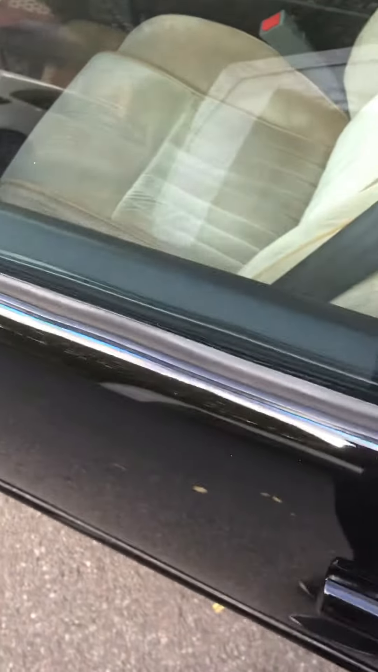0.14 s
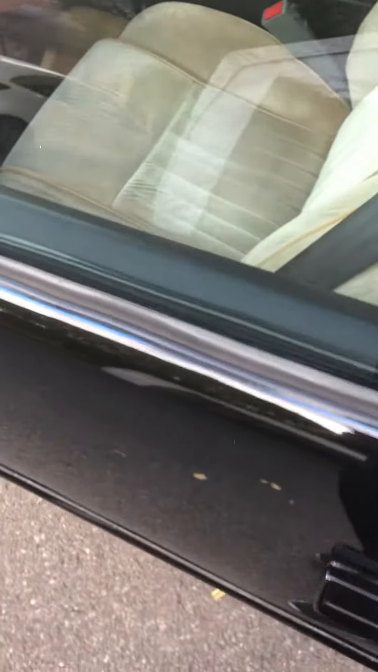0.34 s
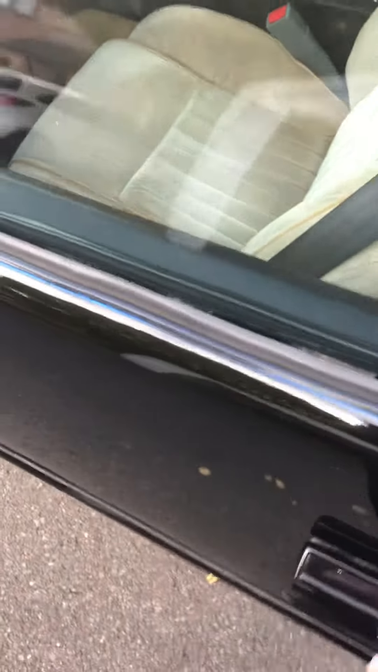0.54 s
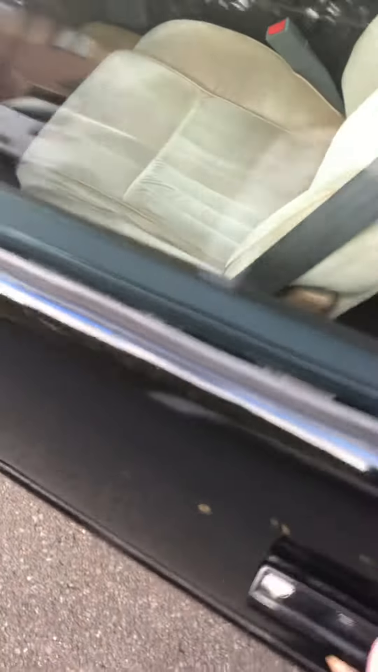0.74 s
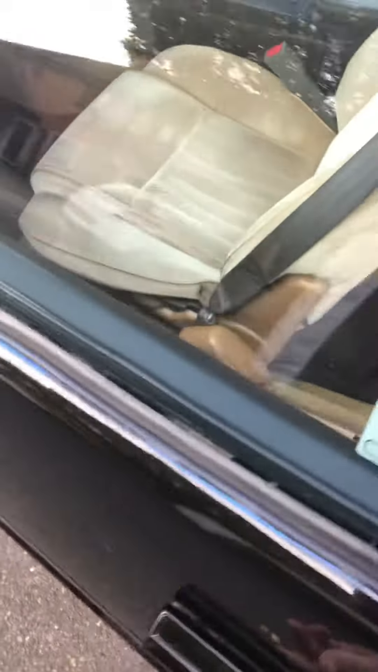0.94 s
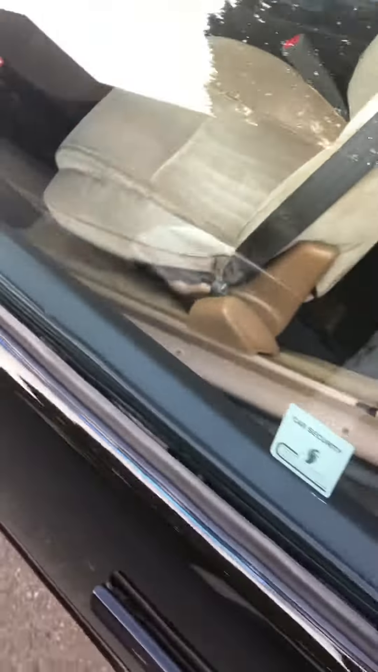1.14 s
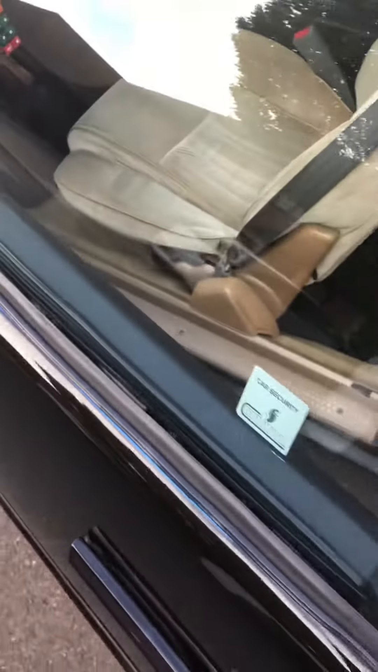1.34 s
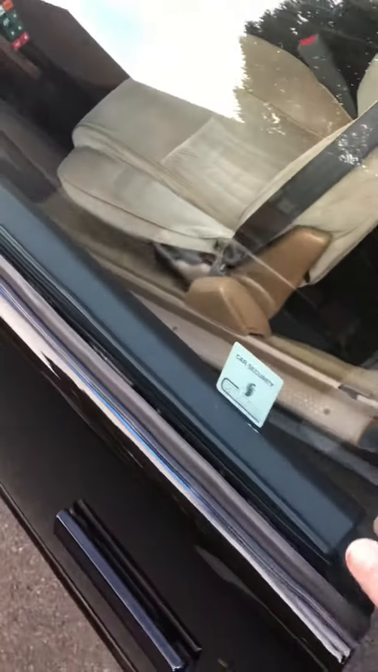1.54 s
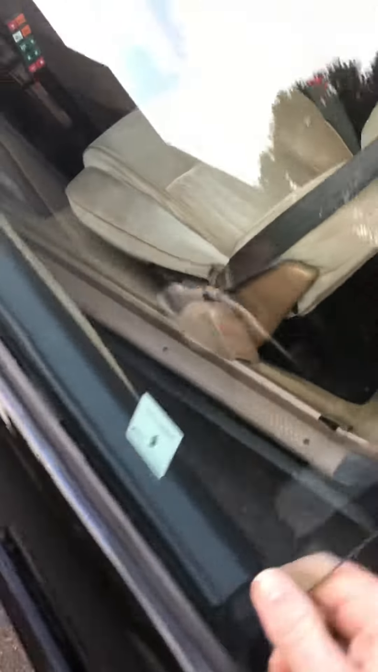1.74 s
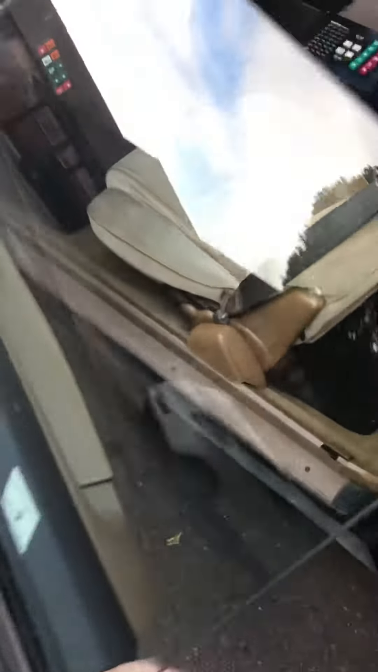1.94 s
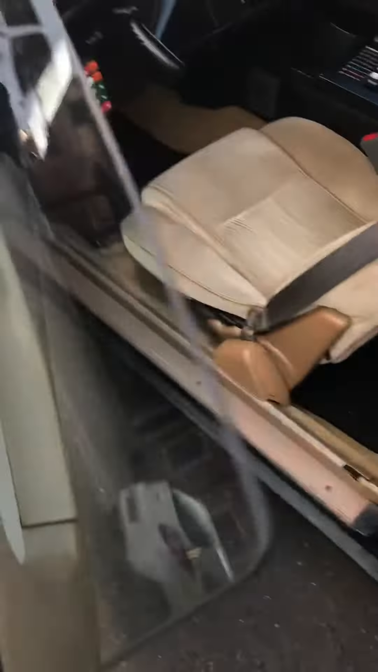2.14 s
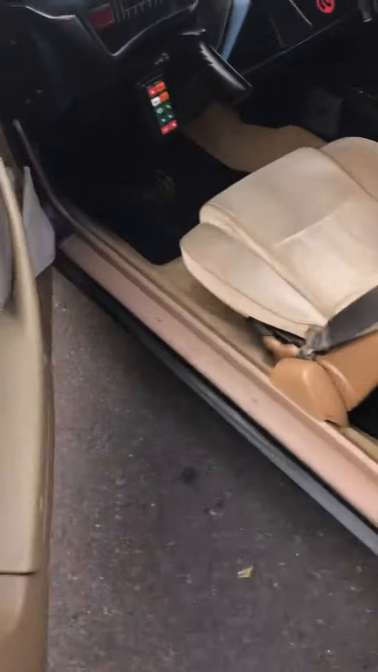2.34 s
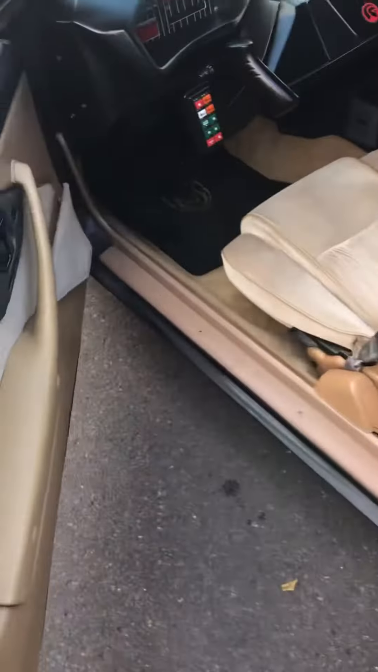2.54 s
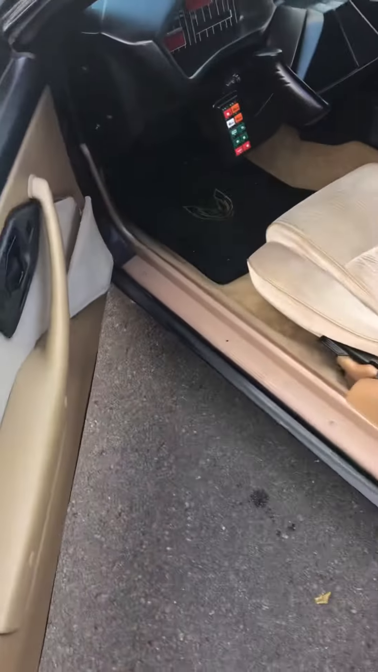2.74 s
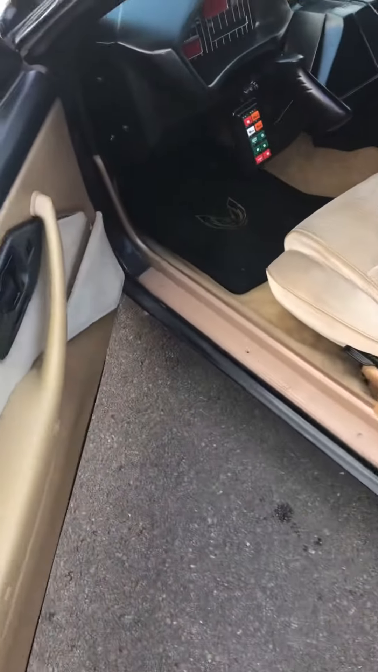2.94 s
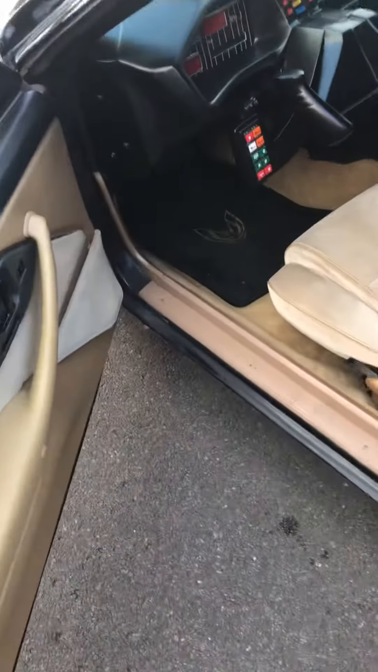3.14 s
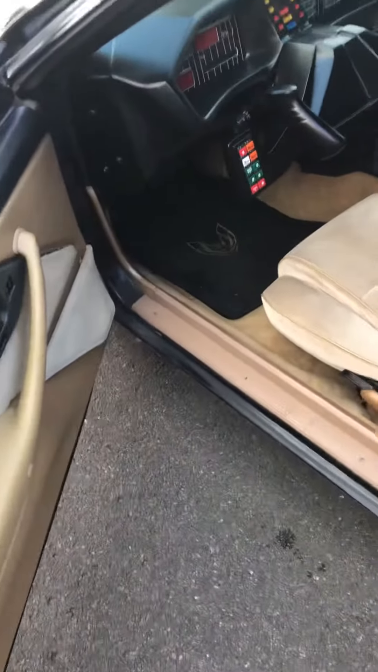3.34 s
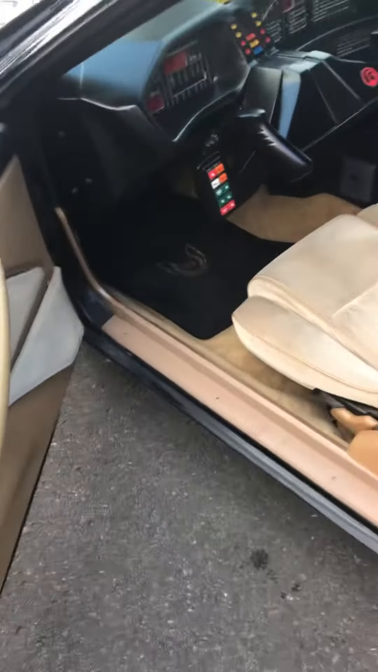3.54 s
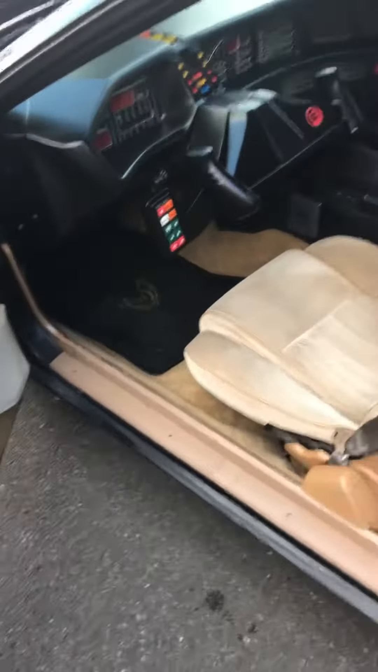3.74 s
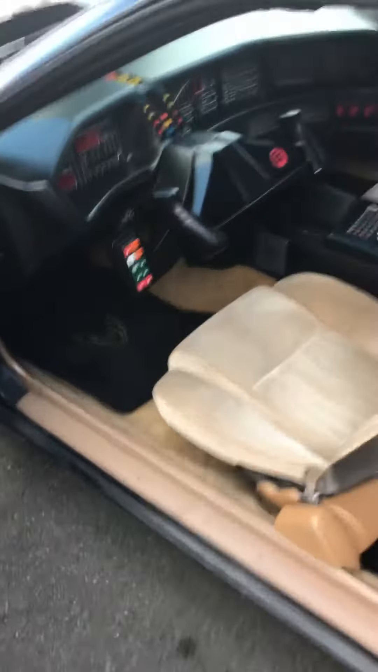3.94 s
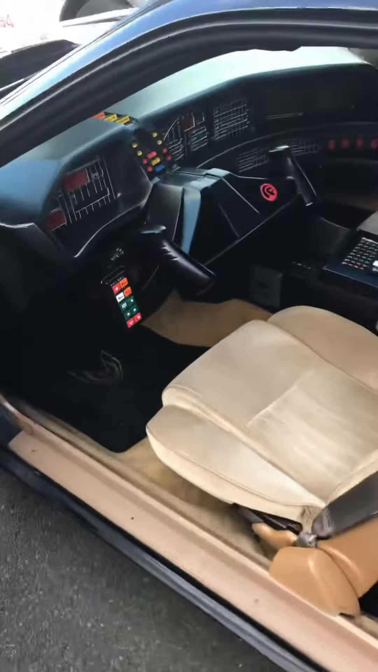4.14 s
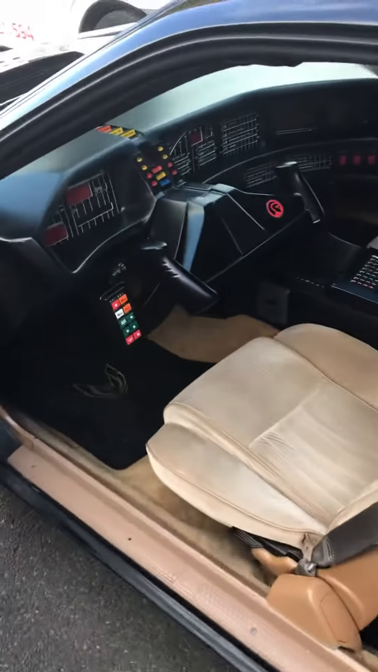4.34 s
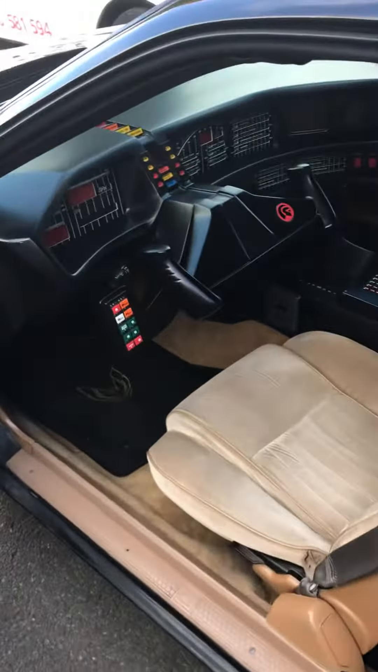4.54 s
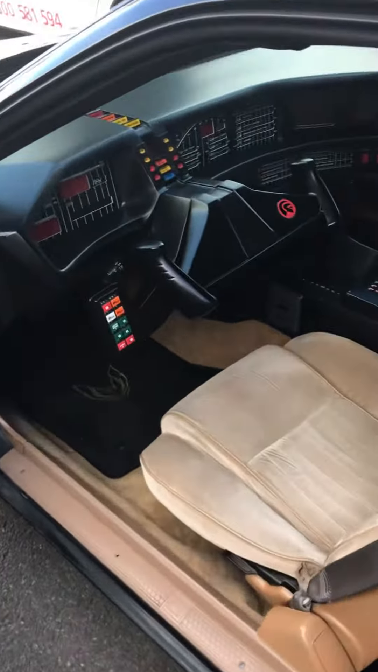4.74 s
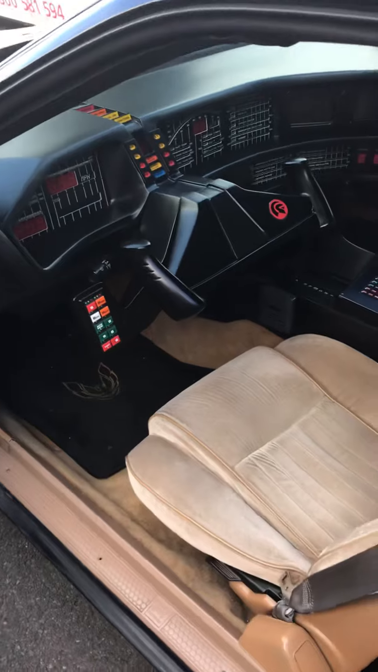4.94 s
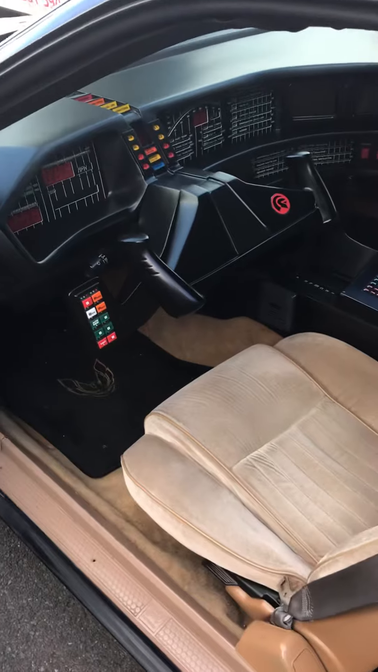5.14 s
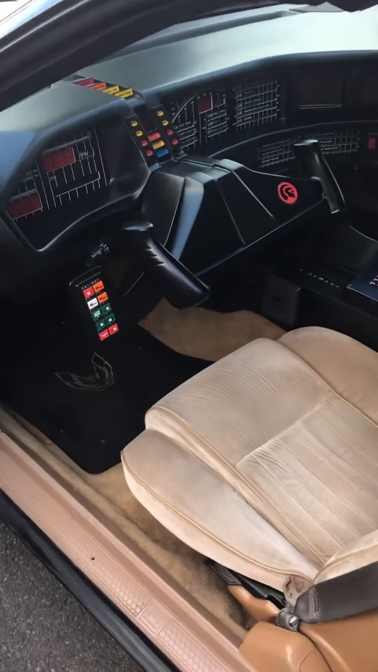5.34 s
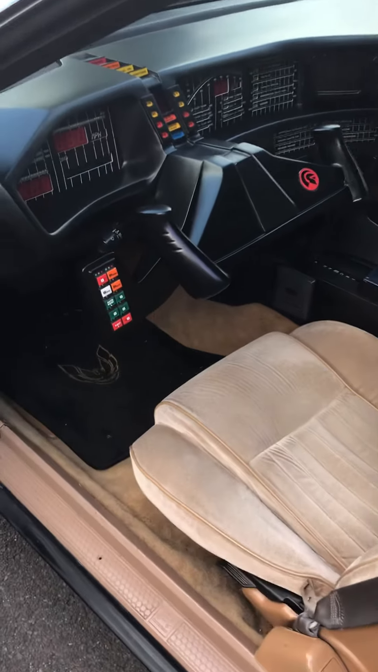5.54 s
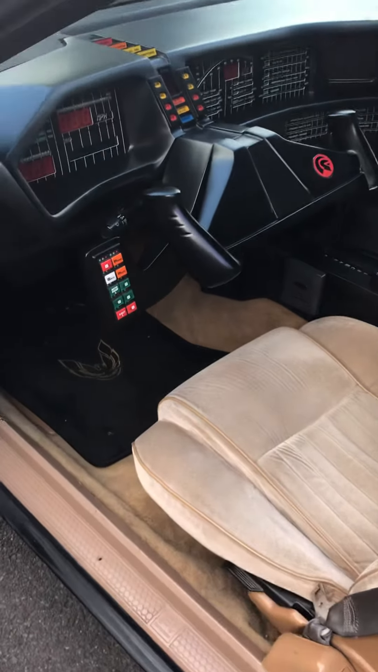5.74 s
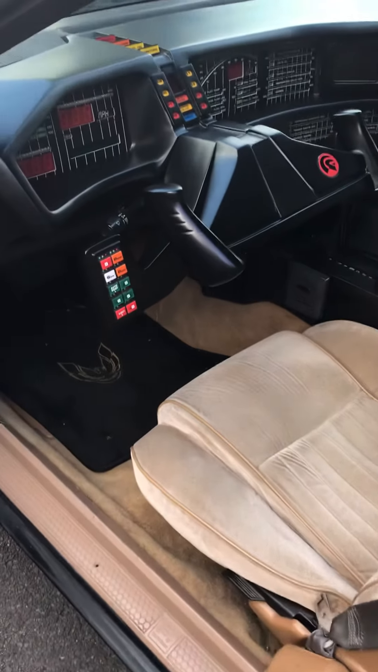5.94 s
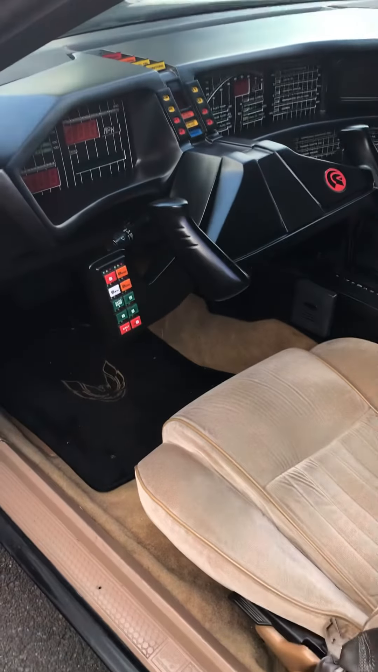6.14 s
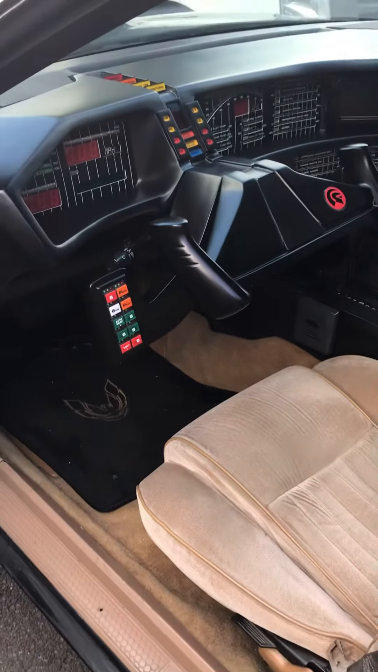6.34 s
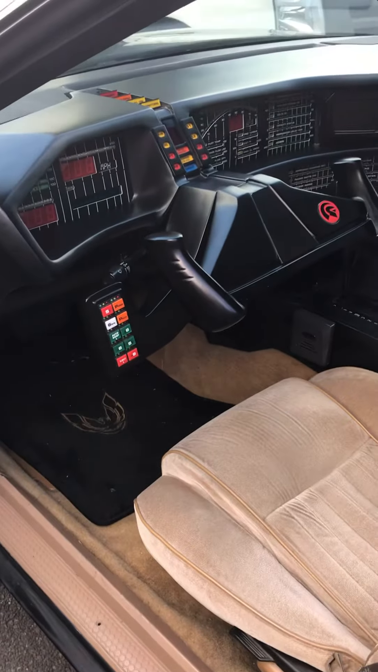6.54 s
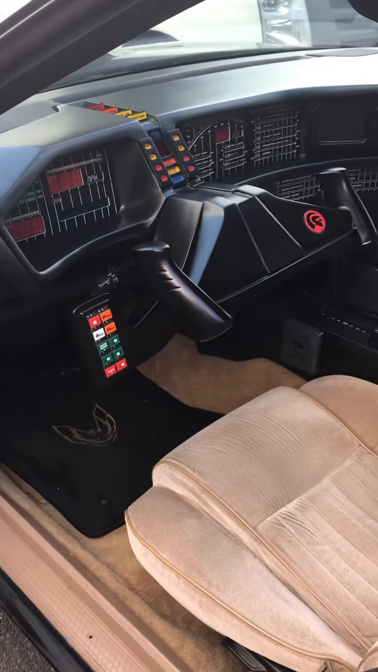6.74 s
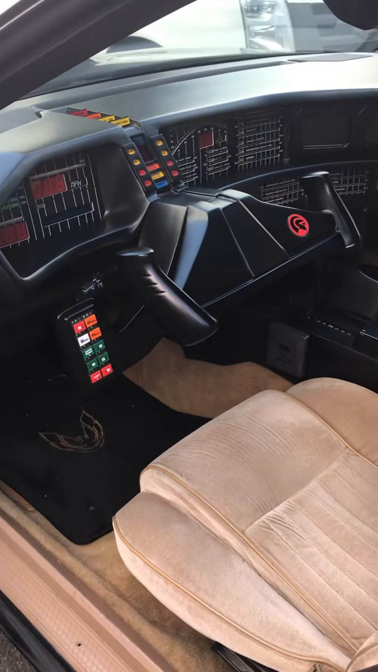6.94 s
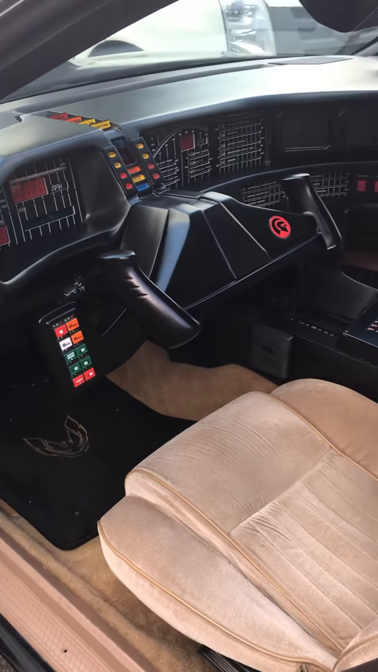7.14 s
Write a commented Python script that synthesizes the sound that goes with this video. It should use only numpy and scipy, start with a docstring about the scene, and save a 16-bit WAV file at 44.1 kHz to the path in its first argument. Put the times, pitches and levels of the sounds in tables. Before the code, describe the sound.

A car door is unlatched with sharp clicks and a hollow clack, thuds as it swings open, then quiet low engine hum and soft outdoor noise.

```python
"""Outdoor noise and a low engine hum come first; then, close by, a car door is opened from outside. The handle
clicks, the latch lets go, steel rings, and the door shudders free and swings out with a snap and bumps.
Contacts are mode clouds coloured by shell resonances and a few treble dips; steel, fittings and panel are
decaying sine modes. Bumps are sinking tones, scrapes are stick-slip click runs, and the engine is an unsteady
hum. The outdoor noise is filtered noise that changes colour as the microphone leans into the cabin."""
import sys
import numpy as np
from scipy import signal
from scipy.fft import rfft, irfft
from scipy.io import wavfile
from scipy.ndimage import uniform_filter1d

SR = 44100
rng = np.random.default_rng(int(sys.argv[2]) if len(sys.argv) > 2 else 0)


def int16_out(signal):
    """Quantize to a 16-bit WAV file."""
    q = np.round(np.clip(np.atleast_2d(signal).T, -1, 1) * 32767)
    wavfile.write(sys.argv[1], SR, q.astype(np.int16))


N = 321742

# handle, latch and hinge contacts, before trim and colouring: (time [s], level [dB], strongest [Hz], fall above
# it [dB/octave], t60 at 2500 Hz [s])
CONTACTS = [(0.2031, -32.5, 900, 8, 0.052), (0.2293, -25, 1124, 12, 0.0303),
            (0.2896, -33.5, 1300, 6.5, 0.052), (0.4633, -16.5, 600, 5, 0.0263),
            (0.4905, -22.5, 1010, 8, 0.034), (0.497, -23, 1120, 7.5, 0.0374), (0.51, -23, 600, 6.5, 0.016),
            (0.553, -37, 820, 8, 0.07), (0.564, -32.5, 910, 12, 0.086), (0.609, -39, 1390, 13, 0.147),
            (0.648, -37.5, 3100, 21, 0.052), (1.09, -32, 1500, 9, 0.25), (1.118, -21, 2700, 5, 0.088),
            (1.128, -22, 740, 9, 0.0666), (1.148, -27.5, 1300, 5.5, 0.09), (1.164, -28, 2000, 9, 0.033),
            (1.43, -50.5, 2000, -0.5, .043), (1.574, -41, 2400, 6, 0.066),
            (2.1408, -25.5, 3060, 18.5, .062), (2.177, -37, 1250, 12, 0.035),
            (3.098, -32.5, 1795, 9, 0.053), (5.322, -46, 4770, 12, 0.039)]
# edges of the bands that decay separately [Hz]
CONTACT_BAND_EDGES_HZ = [280, 800, 2000, 4000, 9000, 16000]
# resonances of handle and door shell, and dips in the treble: (centre [Hz], width [Hz], gain [dB])
CONTACT_PEAKS_AND_DIPS = [(378, 82, 6.5), (500, 72, -0.5), (713, 410, 0.5), (824, 18, 2), (986, 28.5, 2),
                          (1237, 95, 2), (1493.3, 37.5, 4.5), (1636, 547, -9.5), (1771, 48, 11),
                          (2360, 120, -3.5), (2710, 45, -3), (2957, 24.5, 4.5), (3345, 355, -2.5), (3780, 88, -1),
                          (5050, 410, -3), (6750, 510, -0.5), (7740, 880, -8.5), (10590, 660, -6)]
# blows on the door panel, before trim: (time [s], level [dB], spectrum corner [Hz], ring time [factor])
PANEL_BLOWS = [(.230, -35, 800, 2.11), (0.4629, -25, 300, 0.52), (.490, -28, 800, 1.29),
               (0.565, -39, 600, 1.72), (1.098, -33, 250, 0.74), (1.127, -16, 215.7, 1.24),
               (1.149, -26.5, 230, 0.7), (2.15, -47.5, 450, 1.07)]
# door panel modes: (frequency [Hz], relative level [dB], t60 before the blow's factor [s])
PANEL_MODES = [(55.2, -7, 0.257), (76.3, -13.5, 0.33), (121.4, 3, 0.13), (126.5, -16, 0.184),
               (153.85, -4, 0.31), (189.8, 1.5, 0.242), (213.1, -1.5, 0.208), (242.9, 4.5, 0.141),
               (276, 1, 0.206), (296.2, -7.5, 0.375), (343.4, -4, 0.18), (402.8, 1.5, 0.27),
               (474, -10, 0.15), (542.5, -4, 0.19), (630, -21.5, .14), (775.5, -16.5, 0.137)]
# latch steel modes: (frequency [Hz], relative level [dB], t60 [s])
STEEL_MODES = [(2358.4, 3, 0.163), (4490, -10, 0.032), (4600, -23.5, 0.263), (4601, 4.5, 0.1016),
               (4877, -9, 0.083), (6830, -16, .08), (7030, -8, 0.114), (8053, -14, 0.224),
               (8130, -10, 0.041), (8620, -23.5, .08), (11100, -18, .05), (11575, -15, 0.156),
               (12285, -13, .05)]
# strikes on the latch steel: (time [s], level [dB], most excited [Hz], spread [octaves])
STEEL_STRIKES = [(1.122, -24.5, 2500, 0.71), (1.1465, -20, 8900, .2), (1.156, -27.5, 6700, .12),
                 (1.163, -20.5, 4600, .3)]
# door coming free, swinging out, let go: (time [s], level [dB], starting pitch [Hz], swell time [s])
DOOR_BUMPS = [(.464, -11.5, 225, .0066), (.483, -19.5, 215.5, 0.0083), (0.99, -33, 75.4, 0.029),
              (1.219, -33.5, 132, 0.0137), (1.29, -29, 112.5, 0.0133), (2.367, -28, 111.4, 0.0164),
              (2.486, -22, 175, 0.0069), (2.609, -15, 200.5, 0.00802), (2.636, -15, 340, .0024),
              (2.669, -22, 116, 0.01296), (2.698, -32.5, 276, 0.0042), (3.15, -30.5, 129.4, 0.00626),
              (3.313, -34, 210.6, 0.00527)]
# engine hum pitch: (time [s], pitch [Hz])
HUM_PITCH = [(0, 52.42), (1.4, 55.73), (3.8, 54.38), (4.6, 57.47), (5.9, 58.99), (7.3, 55.17)]
# engine hum level: (time [s], level [dB])
HUM_LEVEL = [(0, -53), (.8, -59.5), (1.02, -41), (1.4, -48), (1.6, -66), (2.9, -62.5), (3.3, -54),
             (3.78, -45.5), (4.15, -54), (4.9, -52), (5.12, -42), (5.35, -59.5), (5.6, -44), (6.1, -45.5),
             (6.45, -54.5), (7.15, -47.5), (7.3, -64.5)]
# engine hum partials: (multiple of hum pitch [ratio], relative level before waver [dB])
HUM_PARTIALS = [(0.999, 0.5), (2, -17), (2.43, -10.5), (3.001, -19.5)]
# outdoor noise colour at the shut door: (frequency [Hz], relative density [dB per Hz])
DOOR_SPECTRUM = [(15, -43), (25, -8), (49, 5), (96, 1), (126, 2), (211, -3.5), (572, -11.5), (710, -7),
                 (1470, -15.5), (2030, -15), (3220, -24.5), (5520, -23.5), (10500, -32.5), (13100, -31.5),
                 (15800, -41)]
# the same in the doorway: (frequency [Hz], relative density [dB per Hz])
DOORWAY_SPECTRUM = [(15, -44.5), (25, -18.5), (37, -0.5), (59, 2.5), (157, -7), (200, -5), (241, -14.5),
                    (449, -15.5), (672, -13), (2150, -22), (3050, -28), (3390, -31.5), (6490, -36),
                    (13100, -41), (15800, -50)]
# the same in the cabin: (frequency [Hz], relative density [dB per Hz])
CABIN_SPECTRUM = [(15, -36), (25, -9.5), (43, -9.5), (63, -1), (107, -17.5), (148, -11), (241, -25),
                  (333, -27), (486, -27), (1250, -31), (1590, -33), (3490, -35.5), (4950, -36.5),
                  (6310, -37.5), (15800, -49.5)]
# microphone path: (time [s], place [0 door, 1 doorway, 2 cabin])
MIC_PLACE = [(0, 0.085), (2.05, 0), (2.4, 0.485), (4.3, 0.87), (5.4, 1.323), (6.2, 2.043), (7.3, 1.576)]
# narrow noise colours: (centre [Hz], width [Hz], gain at door [dB], gain in doorway and cabin [dB])
NOISE_HOLLOWS = [(340.8, 28, 5, 1.5), (488, 56, -1.5, -4.5), (651.8, 23, 3, 3), (1170, 280, -1, 4),
                 (2002, 121, 5.5, 0), (2720, 353, 4.5, 3.5), (4476, 290, 1.5, 3), (4890, 320, -6, -6.5),
                 (6820, 1580, 0.5, 6.5), (7653, 610, -2.5, -3.5), (10420, 470, -5.5, -6),
                 (13100, 1030, 0, 2.5)]
# grinding and chattering parts, before colouring: (time [s], length [s], rms [dB], centre [Hz], mean slips
# [1/s])
SCRAPES = [(0.486, 0.0197, -34.5, 6500, 720), (0.525, 0.0313, -44, 810, 440),
           (1.093, 0.0153, -40, 1100, 750), (1.12, 0.029, -40, 13000, 1300),
           (1.122, 0.0357, -30, 2700, 380), (1.162, 0.0231, -33.5, 2860, 800),
           (2.144, 0.0096, -35.5, 3800, 1000), (2.151, 0.0292, -47, 594, 630)]
# clearest ticks of movement beside the car: (time [s], level [dB])
CLEAR_TICKS = [(2.48, -45), (2.717, -46), (3.252, -49.5), (3.624, -48), (4.68, -52.5)]
# handle and door fitting modes: (frequency [Hz], relative level [dB], t60 [s])
FITTING_MODES = [(997, -13, 0.056), (1178, 1, 0.0253), (1380, -10.5, 0.0484), (1494.5, -4.5, 0.058),
                 (1970, -4.5, 0.0254), (2316, -3, 0.0203), (2798, -4.5, 0.0152), (2945, -6.5, 0.025),
                 (3467, -3.5, 0.0146), (3837, -2.5, 0.0244)]
# knocks on the fittings: (time [s], level [dB], most excited [Hz], spread [octaves])
FITTING_KNOCKS = [(0.2027, -27.5, 2800, 0.307), (.2293, -25.5, 2200, 1.18), (0.2927, -22.5, 1344, 0.101),
                  (0.463, -11.5, 1500, 1.33), (0.566, -30.5, 1100, 0.44), (1.133, -20, 1800, 0.77),
                  (2.1408, -20, 2280, 0.323)]
# low rumble, before trim: (time [s], level [dB])
RUMBLE_LEVEL = [(0, -44), (.5, -41), (1.2, -48.5), (1.45, -52), (2.55, -48), (2.8, -51), (3.8, -49),
                (4.6, -53), (5.1, -50), (7.3, -52)]
# midrange wash: (time [s], level [dB])
WASH_LEVEL = [(0, -45.5), (1.15, -47), (1.45, -48.6), (2.25, -49), (2.7, -52), (5.65, -52.5), (6.7, -56),
              (7.3, -56)]

STEEL_RISE_S, FITTING_RISE_S = 0.00327, 0.00032
DOOR_HISS_DB = -55.5  # hiss at the shut door
SHELTER_DB_PER_PLACE = -3  # the car shields the hiss
EDGE_HZ = 15900  # microphone upper limit


def amp(db):
    """Decibels to amplitude."""
    return 10 ** (np.asarray(db) / 20)


def evened(x):
    """Scale to unit rms."""
    return x / np.sqrt(np.mean(x ** 2) + 1e-20)


def curve(rows, column=1):
    """One table column, interpolated at every sample."""
    rows = np.array(rows)
    return np.interp(np.arange(N) / SR, rows[:, 0], rows[:, column])


def read(points, hz):
    """Interpolate a spectrum on a log-frequency axis."""
    f, value = np.transpose(points)
    return np.interp(np.log(hz + 1), np.log(f + 1), value)


def bell(hz, centre_hz, width_hz):
    """Resonance-shaped weight, 1 at the centre."""
    return 1 / (1 + (2 * (hz - centre_hz) / width_hz) ** 2)


def band(hz, lo_hz, hi_hz, order=12):
    """Gain of a soft-edged band; neighbours sum to constant power."""
    return 1 / np.sqrt((1 + (lo_hz / (hz + 1)) ** order) * (1 + (hz / hi_hz) ** order))


def highpass(x, corner_hz):
    """Second-order low cut."""
    return signal.sosfilt(signal.butter(2, corner_hz, "high", fs=SR, output="sos"), x)


def wander(rate_hz):
    """Slow random drift of unit rms."""
    hz = np.fft.rfftfreq(N, 1 / SR)
    return evened(irfft(rfft(rng.standard_normal(N)) * np.exp(-(hz / rate_hz) ** 2), N))


def add(mix, start_s, sound):
    """Mix a sound in at its start time, cut at the end."""
    part = mix[max(round(start_s * SR), 0):][:len(sound)]
    part += sound[:len(part)]


def contacts(gain_db=-2, rise_s=0.000252, damping=0.535, tail_db=-25, tail_t60_s=0.234, tail_tilt=0.142):
    """Each contact rings a dense mode cloud; high bands die first, the hollow door holds a faint tail."""
    out, t = np.zeros(N), np.arange(SR // 3) / SR
    hz = np.fft.rfftfreq(len(t), 1 / SR)
    for start_s, db, peak_hz, fall, t60_s in CONTACTS:
        power = (hz / peak_hz) ** 2 / (1 + (hz / peak_hz) ** 4) ** ((fall / 6 + 1) / 2)
        for lo, hi in zip(CONTACT_BAND_EDGES_HZ, CONTACT_BAND_EDGES_HZ[1:]):
            gains = band(hz, lo, hi)
            share = np.sqrt(np.sum(power * gains ** 2) / np.sum(power))
            random_phases = np.exp(2j * np.pi * rng.random(len(hz)))
            cloud = signal.hilbert(irfft(gains * random_phases, len(t)))
            # modes share one store of energy: flatten the envelope so their sum falls evenly
            cloud = irfft(rfft(np.cos(np.angle(cloud))) * gains, len(t))
            band_t60_s = t60_s * (2500 / np.sqrt(lo * hi)) ** damping
            tail = amp(tail_db - 60 * t / tail_t60_s) * (CONTACT_BAND_EDGES_HZ[0] / lo) ** tail_tilt
            ring = cloud * (1 - np.exp(-t / rise_s)) * (amp(-60 * t / band_t60_s) + tail)
            ring /= np.std(ring[:SR // 100])  # unit level over the first 10 ms
            add(out, start_s, share * amp(db + gain_db) * ring)
    return out


def scrapes(slip_t60_s=0.005, breadth=1.116):
    """Stick and slip: a quick uneven run of tiny clicks, each ringing briefly around the centre pitch."""
    out, t = np.zeros(N), np.arange(SR // 8) / SR
    hz = np.fft.rfftfreq(len(t), 1 / SR)
    for start_s, length_s, db, centre_hz, slips_per_s in SCRAPES:
        # slip rate is redrawn every 35 samples
        pace = rng.exponential(1, len(t) // 35 + 1).repeat(35)[:len(t)]
        slips = np.diff(np.floor(np.cumsum(pace) * slips_per_s / SR), prepend=0)
        arch = np.sqrt(np.maximum(np.sin(np.pi * np.minimum(t / length_s, 1)), 0))
        force = slips * rng.uniform(0.12, 1, len(t)) * arch
        decay = amp(-60 * t / slip_t60_s)
        chatter = signal.fftconvolve(force, decay)[:len(t)] * rng.standard_normal(len(t))
        gains = band(hz, centre_hz / breadth, centre_hz * breadth, order=6)
        chatter = irfft(rfft(chatter) * gains, len(t))
        add(out, start_s, amp(db) * evened(chatter) * np.sqrt(length_s / t[-1]))
    return out


def contact_colour(x):
    """One peaking filter per table entry; the narrow ones ring on."""
    for hz, width_hz, db in CONTACT_PEAKS_AND_DIPS:
        gain = amp(db / 2)
        damp = np.pi * width_hz / SR
        turn = -2 * np.cos(2 * np.pi * hz / SR)
        zeros = [1 + damp * gain, turn, 1 - damp * gain]
        poles = [1 + damp / gain, turn, 1 - damp / gain]
        x = signal.lfilter(zeros, poles, x)
    return x


def struck(modes, hits, rise_s):
    """A hard part rings in decaying modes; each strike favours another range of them."""
    out, t = np.zeros(N), np.arange(SR // 2) / SR
    onset = 1 - np.exp(-t / rise_s)
    for start_s, db, centre_hz, spread_oct in hits:
        for k, (hz, mode_db, t60_s) in enumerate(modes):
            share = (-1) ** k * np.exp(-.5 * (np.log2(hz / centre_hz) / spread_oct) ** 2)
            decay = amp(db + mode_db - 60 * t / t60_s)
            add(out, start_s, share * decay * onset * np.sin(2 * np.pi * hz * t))
    return out


def fittings():
    """Knocked handle and door fittings give a short hard ring."""
    return struck(FITTING_MODES, FITTING_KNOCKS, FITTING_RISE_S)


def latch_steel():
    """Struck latch steel swells over milliseconds, then rings."""
    return struck(STEEL_MODES, STEEL_STRIKES, STEEL_RISE_S)


def panel(gain_db=-5):
    """The door skin booms in low modes; a blow's corner frequency limits how high it reaches."""
    out, t = np.zeros(N), np.arange(SR // 2) / SR
    for start_s, db, corner_hz, ring_factor in PANEL_BLOWS:
        for k, (hz, mode_db, t60_s) in enumerate(PANEL_MODES):
            # sign flips every three modes: neighbouring groups swing against each other
            push = (-1) ** (k // 3) / np.sqrt(1 + (hz / corner_hz) ** 4)
            decay = amp(db + gain_db + mode_db - 60 * t / (t60_s * ring_factor))
            add(out, start_s, push * decay * np.sin(2 * np.pi * hz * t))
    return out


def bumps(sag=0.3005, sag_swells=1.17, shape=2.7, knock_db=-14, knock_ratio=2.826, knock_swell=0.573, low_cut_hz=28):
    """Heavily damped thuds sink in pitch as they swell and die, each with a shorter, higher knock."""
    out, t = np.zeros(N), np.arange(SR // 4) / SR
    for start_s, db, hz, swell_s in DOOR_BUMPS:
        thud = (db, hz, swell_s)
        knock = (db + knock_db, hz * knock_ratio, swell_s * knock_swell)
        for part_db, part_hz, part_s in [thud, knock]:
            u = t / part_s  # time in swells; the envelope peaks at 1
            pitch_hz = part_hz * (sag + (1 - sag) * np.exp(-u / sag_swells))
            turns = np.cumsum(pitch_hz) / SR
            add(out, start_s, amp(part_db) * (u * np.exp(1 - u)) ** shape * np.sin(2 * np.pi * turns))
    return highpass(out, low_cut_hz)


def rustle(ticks_per_s=10, level_db=-56, t60_s=0.057, low_cut_hz=6500):
    """Someone moving beside the car: thin decaying hiss ticks; the random ones weaken after 4.4 s."""
    t = np.arange(SR // 12) / SR
    activity = curve([(0, 0.82), (4.4, 1), (5.2, .35), (7.3, 0.3114)])  # (time [s], factor)
    ticks = amp(level_db) * (rng.random(N) < ticks_per_s / SR) * rng.uniform(0.31, 1, N) * activity
    for start_s, db in CLEAR_TICKS:
        add(ticks, start_s, amp([db]))
    hiss = highpass(rng.standard_normal(N), low_cut_hz)
    return hiss * signal.oaconvolve(ticks, amp(-60 * t / t60_s))[:N]


def engine_phase():
    """Angle of the hum [rad]."""
    return 2 * np.pi * np.cumsum(curve(HUM_PITCH)) / SR


def engine(waver_db=2.13, waver_hz=14.8, jitter_rad=0.392, jitter_hz=6.84):
    """A low hum with a few weak overtones, unsteady in level and phase."""
    phase = engine_phase()
    hum = np.zeros(N)
    for multiple, db in HUM_PARTIALS:
        level = amp(db + waver_db * wander(waver_hz))
        hum += level * np.sin(multiple * (phase + jitter_rad * wander(jitter_hz)))
    return np.sqrt(2) * amp(curve(HUM_LEVEL)) * hum


def outdoors(rumble_db=1.5, flutter_db=1.0, flutter_hz=30.4, hum_gap_db=-5, gust_db=0.26, gust_hz=4.22):
    """Rumble, wash and hiss whose colour follows the microphone from the door into the cabin."""
    hz, place = np.fft.rfftfreq(N, 1 / SR), curve(MIC_PLACE)
    noise, out = rfft(rng.standard_normal(N)), np.zeros(N)
    rumble = amp(curve(RUMBLE_LEVEL) + rumble_db + gust_db * wander(gust_hz))
    wash = amp(curve(WASH_LEVEL))
    hiss = amp(DOOR_HISS_DB + SHELTER_DB_PER_PLACE * place)
    layers = [(band(hz, 15, 280), rumble), (band(hz, 280, 3500), wash), (band(hz, 3500, 20000), hiss)]
    hum_gap = hum_gap_db * bell(hz, 53.3, 25)  # dip around the hum pitch
    for k, spectrum in enumerate([DOOR_SPECTRUM, DOORWAY_SPECTRUM, CABIN_SPECTRUM]):
        hollows = sum((inside if k else outside) * bell(hz, f, width)
                      for f, width, outside, inside in NOISE_HOLLOWS)
        coloured = noise * amp(read(spectrum, hz) + hollows + hum_gap)
        nearness = np.maximum(1 - abs(place - k), 0)
        for gains, level in layers:
            out += nearness * level * evened(irfft(coloured * gains, N))
    return out * amp(flutter_db * wander(flutter_hz))


def enlivened(noise):
    """The noise, mostly its hiss, throbs once in two hum cycles and shimmers in small patches."""
    # (frequency [Hz], depth [dB])
    shimmer_db = [(300, 0.32), (1500, 0.88), (4500, 0.99), (6500, 2.58), (9000, 3.5), (15000, 2.95)]
    throb_db = [(300, 0.21), (2000, 0.036), (6500, 0.032), (10000, 1.08), (13000, 0.83)]
    hz, t, z = signal.stft(noise, SR, nperseg=512, noverlap=384)
    patches = uniform_filter1d(rng.standard_normal(z.shape), size=4, axis=0)
    patches = evened(uniform_filter1d(patches, size=7, axis=1))
    throb = np.sin(np.interp(t * SR, np.arange(N), engine_phase()) / 2)
    gain = amp(read(shimmer_db, hz)[:, None] * patches + read(throb_db, hz)[:, None] * throb)
    gain /= np.sqrt(np.mean(gain ** 2, axis=1, keepdims=True))  # keep the mean colour
    return signal.istft(z * gain, SR, nperseg=512, noverlap=384)[1][:N]


def scene():
    """The door close by, over the engine and the outdoor noise."""
    shell = contact_colour(contacts() + scrapes())
    door = shell + fittings() + latch_steel() + panel() + bumps()
    background = rustle() + engine() + enlivened(outdoors())
    return (door + background)[None]


def record(dry, low_cut_hz=28):
    """The microphone's band limits."""
    thinned = highpass(dry, low_cut_hz)
    edge = signal.firwin(511, EDGE_HZ, window=("kaiser", 9), fs=SR)
    return signal.oaconvolve(thinned, edge[None], "same")


dry = scene()
out = record(dry)
int16_out(out)
```